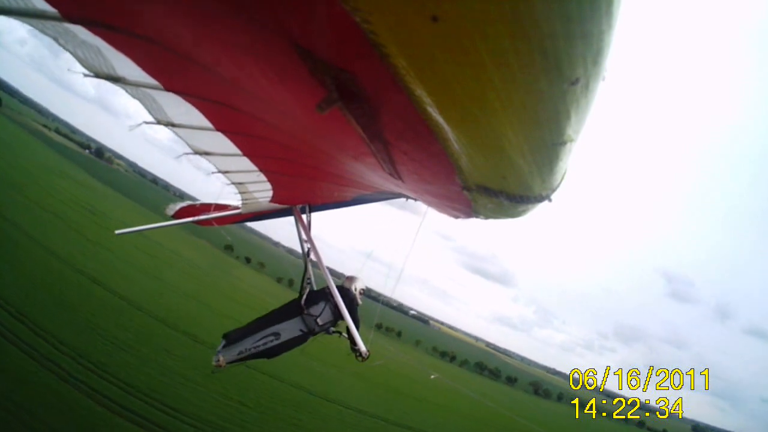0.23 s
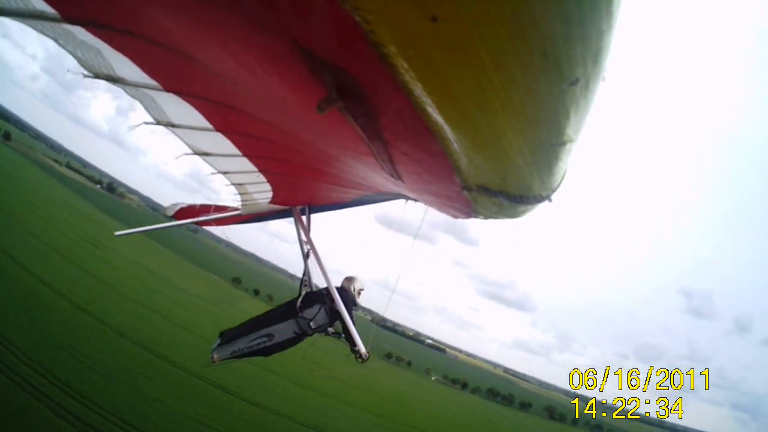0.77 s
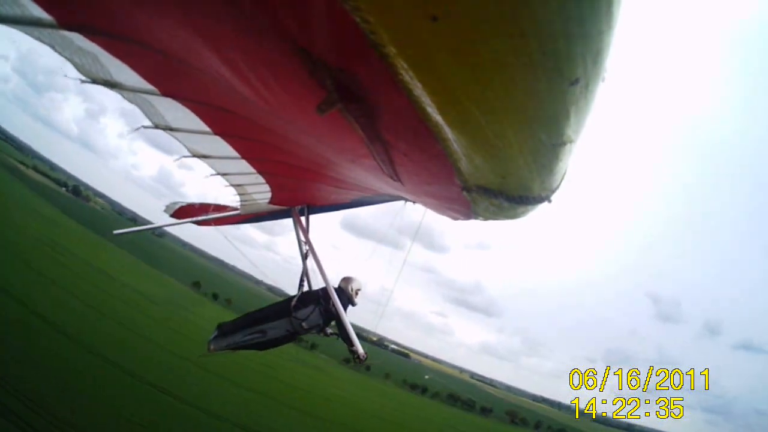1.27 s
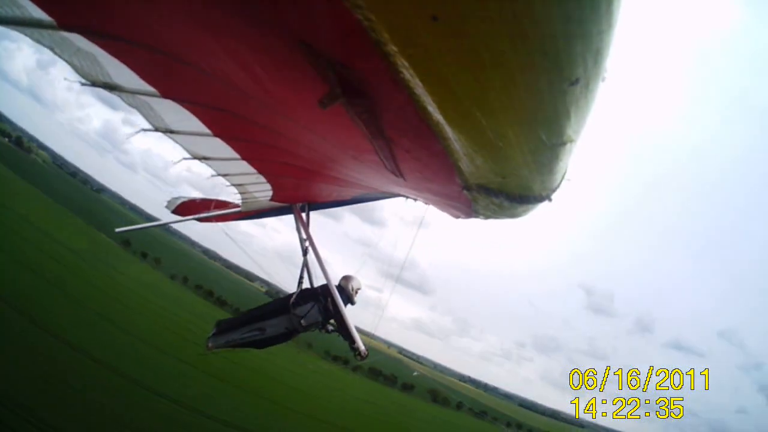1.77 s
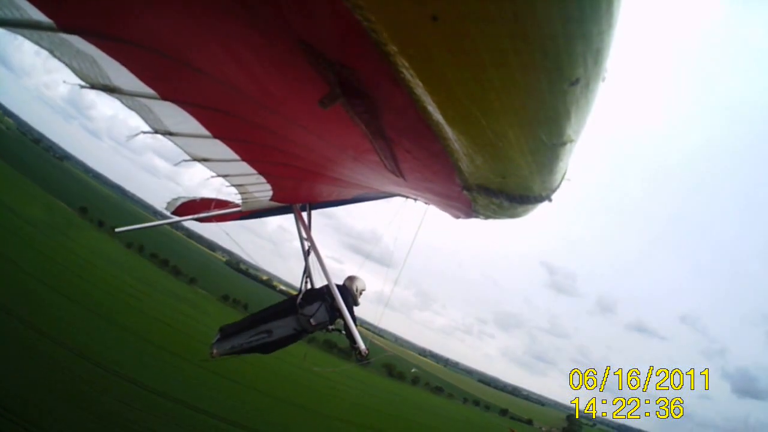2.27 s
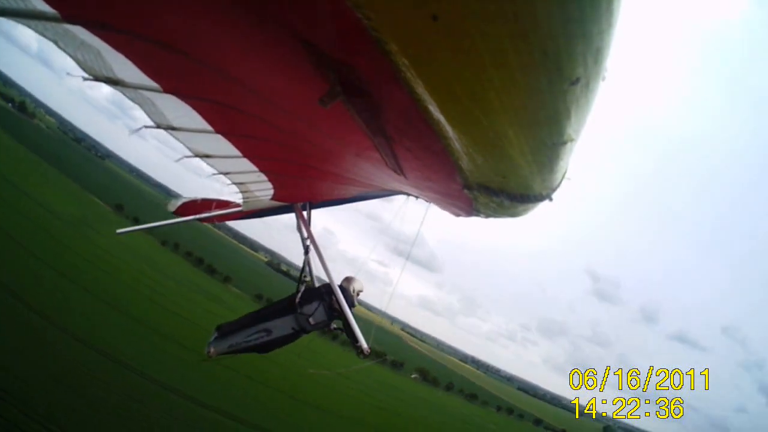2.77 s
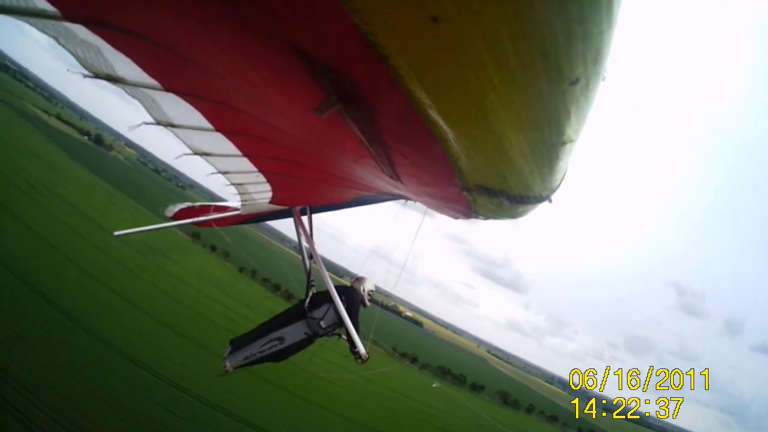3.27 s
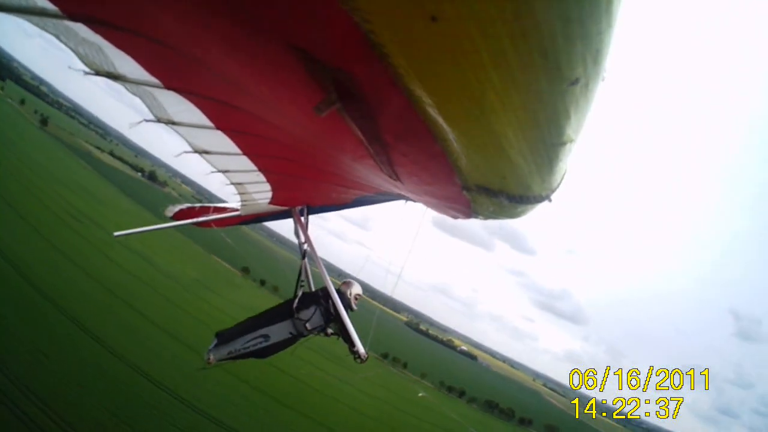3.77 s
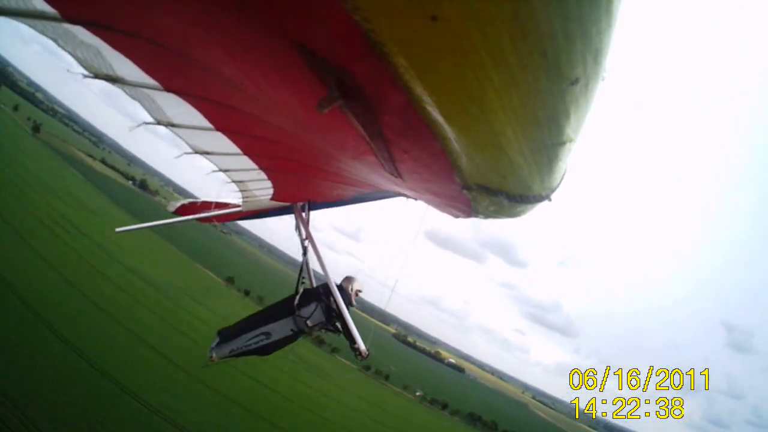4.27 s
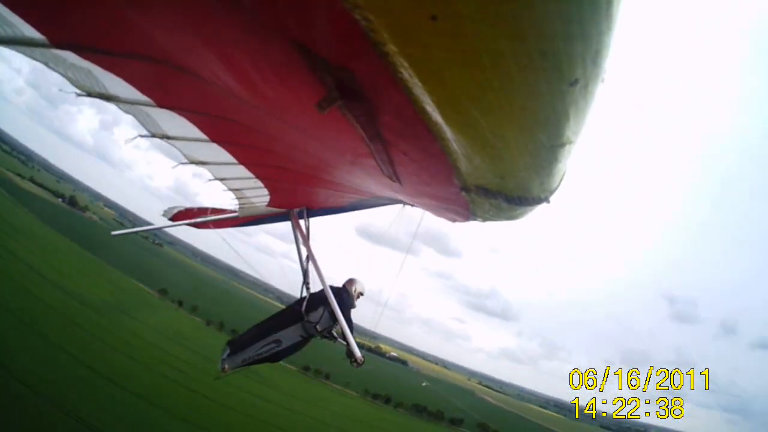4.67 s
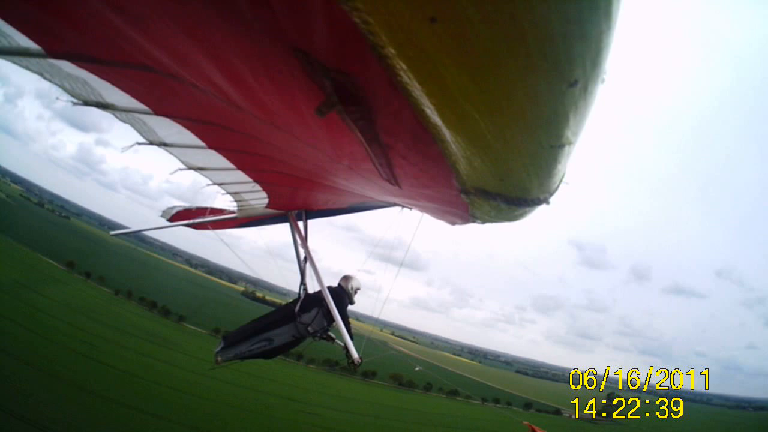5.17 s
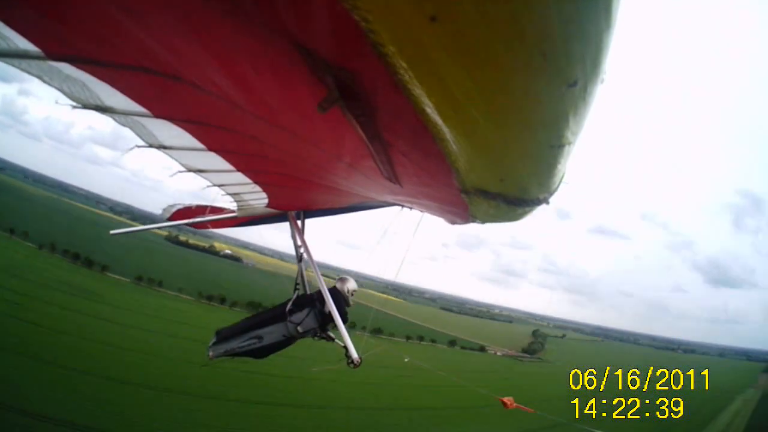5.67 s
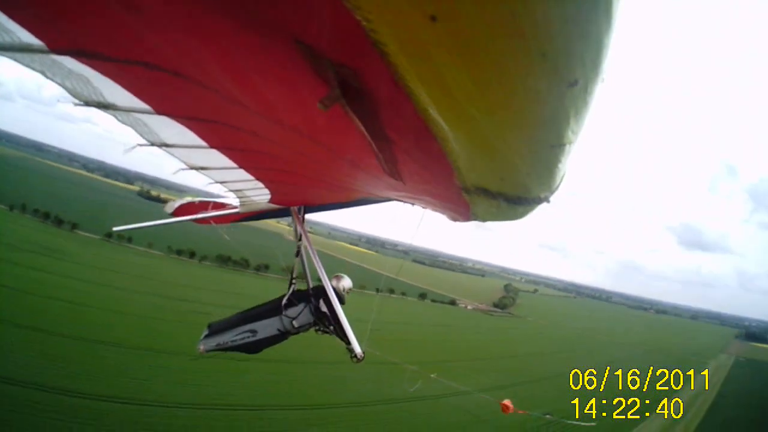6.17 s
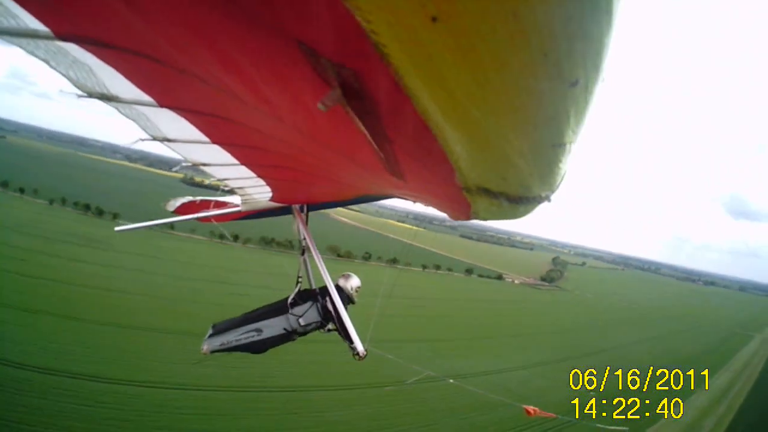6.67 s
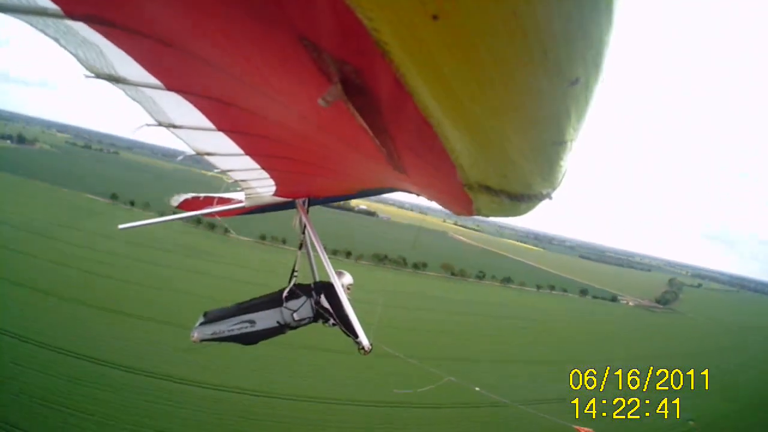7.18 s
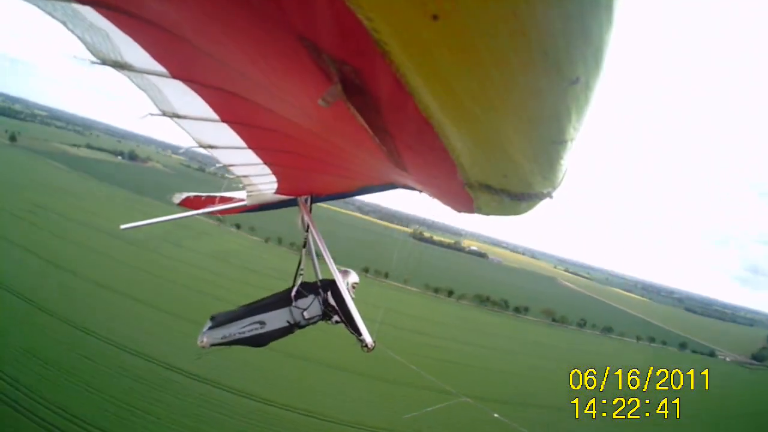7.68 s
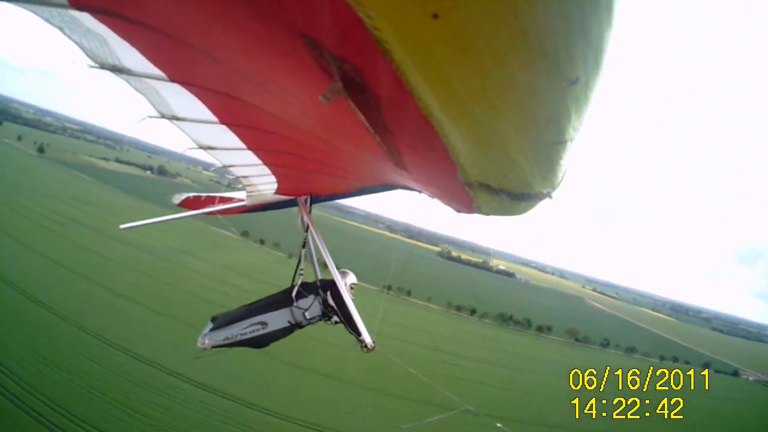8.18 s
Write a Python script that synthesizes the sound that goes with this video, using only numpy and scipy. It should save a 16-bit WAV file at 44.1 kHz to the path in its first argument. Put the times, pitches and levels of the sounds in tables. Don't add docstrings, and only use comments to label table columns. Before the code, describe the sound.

A microphone clamped to a glider's wing tube picks up heavy low rumble, a throbbing sail and a dull, hollow rush of air. Scattered knocks come in clusters. After a windier swell and a quieter lull, a violent clatter jolts the frame, rebounds in several thuds, and thins to sparse ticks over renewed wind.

```python
import sys
import numpy as np
from scipy import signal
from scipy.fft import rfft, irfft
from scipy.io import wavfile
from scipy.ndimage import uniform_filter1d

SR = 44100
rng = np.random.default_rng(int(sys.argv[2]) if len(sys.argv) > 2 else 0)


def decibels_to_gain(level_db):
    exponent = np.asarray(level_db, float) / 20
    return 10 ** exponent


def wrap_up_sound(samples):
    columns = np.atleast_2d(samples).T
    tamed = np.clip(columns, -1, 1)
    steps = np.round(tamed * 32767).astype(np.int16)
    wavfile.write(sys.argv[1], SR, steps)


N = 371763
TIME_S = np.arange(N) / SR


def in_time(rows):
    s, *columns = np.transpose(rows)
    return [np.interp(TIME_S, s, column) for column in columns]


def rms_one(x):
    return x / np.sqrt(np.mean(x ** 2) + 1e-20)


def drift(rate_hz):
    r = np.exp(-80 * np.pi * rate_hz / SR)
    white = rng.standard_normal(N // 40 + 2002)
    slow = signal.lfilter([1], [1, -2 * r, r * r], white)[2000:]
    return np.interp(np.arange(N) / 40, np.arange(len(slow)), rms_one(slow))


def resonate(x, hz, width_hz):
    r = np.exp(-np.pi * width_hz / SR)
    zeros = np.array([1, 0, -1]) * (1 - r * r) / 2
    poles = [1, -2 * r * np.cos(2 * np.pi * hz / SR), r * r]
    return signal.lfilter(zeros, poles, x + 1e-18)


def evened(x, window_s, share):
    power = uniform_filter1d(x ** 2, size=int(window_s * SR)) + 1e-9
    return rms_one(x / power ** (share / 2))


# t/s, level/dB
SWAY = [(0.0, -27.5), (0.7, -30), (1.03, -29.5), (2.49, -42), (2.96, -28), (3.19, -24.5), (3.85, -25),
        (4.27, -32.5), (4.69, -31.5), (5.05, -39.5), (5.33, -35), (5.8, -42), (6.17, -32.5), (7.0, -36.5),
        (8.12, -38), (8.43, -43.5)]
# f/Hz, level/dB per Hz
BUFFET = [(10, 1.5), (25, 0), (50, 0.5), (100, -0.5), (160, -14.5), (200, -23), (300, -38.5)]
HUM_DB, HUM_FOLLOWS, HUM_FOLLOWS_SWAY, HUM_WANDER_DB = -29, 0.76, 0.3, 1.5


def frame():
    speed_db, _ = air_stream()
    rough_db, = in_time(SWAY)
    flutter_hz, flutter_db = in_time(FLUTTER)
    sway_db = jolted(rough_db + 3.0 + 2.1 * drift(2.6), column=1)
    hum_db = HUM_DB + HUM_FOLLOWS * speed_db + HUM_FOLLOWS_SWAY * (rough_db - rough_db.mean())
    hum_db = jolted(hum_db + HUM_WANDER_DB * drift(1.9), column=2)
    shaken = flutter(flutter_hz, flutter_db)
    shaken = shaken + decibels_to_gain(sway_db + 1.0) * sway(speed_db) + decibels_to_gain(hum_db - 1.0) * batten_hum()
    port_db = 0.54 * (sway_db + hum_db) - 0.039 * flutter_db + 0.9
    return shaken + decibels_to_gain(port_db) * buffet(BUFFET, lumpy_db=-3.0)


# t/s, f/Hz, level/dB
FLUTTER = [(0.0, 74.51, -23.5), (1.06, 76.24, -22), (2.35, 68.9, -26.5), (2.96, 79.17, -24.5),
           (3.19, 65.1, -23.5), (3.52, 68, -19), (3.71, 75.77, -19), (3.83, 66.5, -23.5),
           (4.3, 73.32, -21.5), (4.51, 67.31, -27), (5.42, 72.7, -28.5), (5.66, 66.33, -35.5),
           (6.15, 75.82, -27), (6.93, 63.54, -35.5), (7.04, 75.95, -25.5), (7.37, 68.66, -30.5),
           (7.65, 76.8, -28), (8.43, 70.5, -32)]


def flutter(hz, level_db):
    turns = np.cumsum(hz * (1 + 0.03913 * drift(8.57))) / SR
    tone = np.sqrt(2) * np.sin(2 * np.pi * turns)
    return tone * decibels_to_gain(level_db - 0.26 + puffs() + 2.2 * drift(21))


# t/s, change of the flutter level/dB
PUFFS = [(0.27, -11), (0.62, -10.5), (0.92, 7), (1.55, -19), (1.74, -1.5), (1.9, -9), (2.6, 4), (3.08, -2),
         (3.28, 3), (3.34, -2), (4.46, -12.5), (4.86, 8.5), (5.0, -3.5), (5.33, -7), (5.54, 7.5),
         (5.73, -8), (6.36, -17), (6.74, 8.5), (6.88, -6), (7.3, -23), (7.39, 1.5), (7.51, -5), (7.71, -5),
         (7.96, 7)]


def puffs():
    puff_s = 0.039
    return sum(db * np.exp(-((TIME_S - s) / puff_s) ** 2) for s, db in PUFFS)


def sway(speed_db):
    sway_hz, width_hz = 40.34, 8
    loose = resonate(resonate(rng.standard_normal(N), sway_hz, width_hz), sway_hz, 37)
    turns = np.cumsum(sway_hz * (1 + 0.017 * drift(1.0))) / SR
    locked = np.sqrt(2) * np.sin(2 * np.pi * turns)
    lock = np.clip(speed_db / 8.7, 0, 1)
    return np.sqrt(lock) * locked + np.sqrt(1 - lock) * evened(loose, 0.055, share=0.61)


def batten_hum():
    hum_hz, width_hz = 134.7, 31
    hum = resonate(resonate(rng.standard_normal(N), hum_hz, width_hz), hum_hz, 98)
    return evened(hum, 0.081, share=0.4)


# t/s, sway level/dB, batten hum level/dB, port eddies level/dB, fall/s
JOLTS = [
    (6.069, -16.5, -22, -26.5, 0.097),
    (6.36, -41, -42, -47, 0.029),
    (6.481, -14.5, -45, -37, 0.043),
]


def jolted(steady_db, column):
    rise_share = 0.68
    power = decibels_to_gain(2 * steady_db)
    for row in JOLTS:
        late = (TIME_S - row[0]) / row[-1]
        late = np.where(late < 0, late / rise_share, late)
        power = power + decibels_to_gain(2 * row[column]) * np.exp(-2 * late ** 2)
    return 10 * np.log10(power)


def buffet(spectrum, lumpy_db):
    hz = np.fft.rfftfreq(N, 1 / SR) + 1
    corner_hz, corner_db = np.transpose(spectrum)
    colour_db = np.interp(np.log(hz), np.log(corner_hz), corner_db, right=-120)
    noise = irfft(rfft(rng.standard_normal(N)) * decibels_to_gain(colour_db), N)
    return rms_one(noise) * decibels_to_gain(lumpy_db * drift(4.4))


# t/s, peak level/dB, middle modes relative level/dB, top modes relative level/dB
RELEASE = [(5.998, -6, -19.5, -36), (6.004, -17, -13, -33), (6.014, -10.5, -13, -33),
           (6.025, -16.5, -10, 7.5), (6.030, -9.5, -1, -25), (6.043, -6, -12, -35), (6.055, -5.5, -14, -8),
           (6.061, -6, -2.5, -20), (6.070, 4, -5.5, -25), (6.076, -2.5, -6.5, -11),
           (6.083, -10.5, -4.5, -3.5), (6.087, -9, -6, -1), (6.099, -2.5, -2.5, -13),
           (6.103, -0.5, -6, -16.5), (6.111, -10, -4, -14), (6.116, -6.5, 2, -16), (6.124, -2, -16, -23),
           (6.132, -14, -7, -17), (6.146, -5.5, -6, -26), (6.165, 0, -12.5, -22.5), (6.172, -15, 1, -21),
           (6.178, -15, 2, -14), (6.183, -6, -9.5, -18), (6.189, 8, -13.5, -28.5), (6.194, 1.5, -17.5, -23)]
# t/s, peak level/dB, middle modes relative level/dB
KNOCKS = [(0.174, -19, -29), (0.771, -28.5, -16.5), (1.266, -18, -12.5), (1.327, -20, -12),
          (1.346, -13, -16), (1.363, -15, -12), (1.415, -17, -24), (1.501, -19.5, -8.5),
          (1.589, -22.5, -22), (3.342, -14, -22.5), (3.465, -16, -27), (3.494, -14.5, -23),
          (4.373, -23.5, -24), (4.393, -21, -2), (4.427, -16.5, -12), (4.444, -24, -17), (4.55, -25, -14),
          (4.574, -19, -14), (4.589, -16.5, -14.5), (4.639, -21, -18), (4.664, -20, -24), (4.702, -27, -28),
          (4.75, -21, -26), (5.007, -23.5, -16), (5.261, -23.5, -29), (5.414, -18, -13.5),
          (5.436, -17.5, -16.5), (5.498, -24, -11)]
# t/s, peak level/dB, middle modes relative level/dB
SETTLING = [(6.272, -17, 1.5), (6.301, -13.5, -18), (6.395, -13, -13), (6.494, -12.5, -21),
            (6.572, -29, -21), (6.611, -17.5, -24), (6.634, -22, -17), (6.855, -18, -9.5),
            (7.013, -22.5, -22), (7.075, -21, -13), (7.19, -22, -19), (7.603, -26, -27)]
# t/s of landing, peak level/dB, middle modes relative level/dB,
# top modes relative level/dB, touch earlier by/ms
ROCKS = [(1.44, -16.5, -7.5, -41, 9.2), (4.517, -14.5, -18, -48, 20), (5.114, -23, -19, -37, 18),
         (5.234, -13, -4, -19, 11), (5.343, -22.5, -7.5, -38, 26), (5.519, -24, -8.5, -28, 24),
         (6.331, -5, -15, -31, 7), (6.384, -12, -5.5, -23, 10), (6.431, -9, -16, -30, 14),
         (6.487, -12, -10, -15, 7.2), (6.914, -12.5, -12.5, -36, 16), (7.297, -18, -10, -31, 28)]
KNOCK_TOP_DB, KNOCK_MS, RELEASE_MS = -33.5, 5.18, 3.17
TOUCH_LOSS_DB, TOUCH_BRIGHTER_DB, TOUCH_MS = 9, 6, 4.3
TAUT_TOP_GAIN = 2.7


def contacts():
    speed_db, _ = air_stream()
    rows = [(*row, RELEASE_MS) for row in RELEASE]
    for s, db, middle_db in KNOCKS + SETTLING:
        taut_db = TAUT_TOP_GAIN * max(speed_db[round(s * SR)], 0)
        rows.append((s, db, middle_db, KNOCK_TOP_DB + taut_db, KNOCK_MS))
    for s, db, middle_db, top_db, earlier_ms in ROCKS:
        rows.append((s, db, middle_db, top_db, KNOCK_MS))
        touch_s = s - earlier_ms / 1000
        rows.append((touch_s, db - TOUCH_LOSS_DB, middle_db + TOUCH_BRIGHTER_DB, KNOCK_TOP_DB, TOUCH_MS))
    lengths = np.exp(0.2 * rng.standard_normal(len(rows)))
    return [(*row[:-1], row[-1] * length) for row, length in zip(rows, lengths)]


# f/Hz, width in the wind f/Hz, wind level/dB, width when struck f/Hz, struck level/dB
LOW_MODES = [(384, 200, -18, 98, -15.5), (549, 95, -4, 70, -6), (747.3, 130, 1.5, 70, -0.5),
             (895.6, 106, 1.5, 87, -6), (1079, 131, 0.5, 53, 2), (1206, 190, -3.5, 25, -17)]
MIDDLE_MODES = [(1660, 170, -8.5, 270, -11), (2188, 150, -1.5, 85, 0.5), (2390, 300, -3, 150, -5),
                (2602, 220, 1.5, 81, 5.5), (2758, 160, -6.5, 160, 2.5), (3050, 140, -4.5, 54, -21.5)]
TOP_MODES = [(3550, 130, -12.5, 120, 8), (3873, 500, -7, 120, 2), (4422, 420, -10, 170, 7.5),
             (4800, 450, -17, 380, -6), (5250, 1300, -40.5, 220, -0.5), (6700, 2800, -27, 470, -12)]


def knocks(events):
    rows = np.array(events)
    length = 2600
    chatter = rng.standard_normal((len(rows), length))
    uneven = rng.standard_normal((len(rows), 18))
    age_ms = np.arange(length) / SR * 1000
    out = np.zeros(N + length)
    k = 0
    # modes, relative dB, group dB, share of the contact length, lead in ms
    groups = ((LOW_MODES, 0, -3, 2.4, 3.2),
              (MIDDLE_MODES, rows[:, 2], -2.5, 1.3, 1.4),
              (TOP_MODES, rows[:, 3], -2.2, 0.9, 0.2))
    for modes, rel_db, group_db, brief, lead_ms in groups:
        span_ms = np.clip(rows[:, 4:] * brief, 0.2, 30)
        pressure = np.sin(np.pi * np.clip(age_ms / span_ms, 0, 1) ** (brief / 3))
        force = chatter * pressure
        rings = 0
        for hz, _, _, width_hz, struck_db in modes:
            ring = resonate(resonate(force, hz, width_hz), hz, 0.34 * hz)
            rings = rings + ring * (-1) ** k * decibels_to_gain(struck_db + 0.35 * uneven[:, k:k + 1])
            k += 1
        gains = decibels_to_gain(rows[:, 1] + rel_db + group_db) / np.abs(rings).max(axis=1)
        for s, gain, ring in zip(rows[:, 0] - lead_ms / 1000, gains, rings):
            out[round(s * SR):][:length] += gain * ring
    return out[:N]


# t/s, speed as high rush level/dB, extra turbulence of sideslip level/dB
AIR = [(0.0, -42, 0.5), (0.84, -43, -.5), (1.15, -46, -1.5), (1.76, -46, 1.5), (2.4, -43.5, -0.3),
       (2.58, -41.5, 2.5), (2.95, -40.5, 3), (3.36, -39.5, 0.5), (3.76, -40, -0.5), (4.25, -47.5, -0.1),
       (4.5, -49.5, -1.5), (5.14, -52.5, -0.1), (5.8, -52, -0.5), (6.41, -51, 1.2), (6.8, -48.5, 0.2),
       (7.25, -44.5, 1.2), (7.7, -44.5, -1.5), (8.43, -48, -0.5)]


def air_stream():
    air_db, slip_db = in_time(AIR)
    return air_db + 45, slip_db


# f/Hz, level/dB per Hz
EDDIES = [(120, -19), (185, 2), (260, -3), (400, -3), (1000, -13.5), (1400, -25.5), (1900, -19),
          (3300, -26), (5000, -37.5), (6500, -53), (7200, -55.5)]
HIGH_RUSH_DB, LOW_RUSH_DB, LOW_FOLLOWS = -45.5, -37, 0.79
EDDY_DB, EDDY_FOLLOWS, EDDY_FOLLOWS_SLIP = -39.5, 0.87, 1.2


def rush():
    speed_db, slip_db = air_stream()
    low_db = LOW_RUSH_DB + LOW_FOLLOWS * speed_db + slip_db
    high_db = HIGH_RUSH_DB + speed_db
    eddy_db = jolted(EDDY_DB + EDDY_FOLLOWS * speed_db + EDDY_FOLLOWS_SLIP * slip_db, column=3)
    gust = drift(3.9) + 0.34 * drift(45)
    low = decibels_to_gain(low_db) * singing(LOW_MODES, 0.49 * gust)
    high = decibels_to_gain(high_db) * singing(MIDDLE_MODES + TOP_MODES, 0.77 * gust)
    eddies = decibels_to_gain(eddy_db + 0.22 * gust) * buffet(EDDIES, lumpy_db=1.45)
    return low + high + eddies


def singing(modes, gust_db):
    out = 0
    for hz, width_hz, wind_db, _, _ in modes:
        band = resonate(resonate(rng.standard_normal(N), hz, 1.2 * width_hz), hz, 1.2 * width_hz)
        out = out + band * decibels_to_gain(wind_db + 0.36 * drift(6.4))
    return rms_one(out * decibels_to_gain(gust_db))


def wire():
    wire_hz, width_hz = 559.4, 20
    hum = resonate(resonate(rng.standard_normal(N), wire_hz, width_hz), wire_hz, 2 * width_hz)
    return decibels_to_gain(-51.5) * rms_one(hum)


def scene():
    return (frame() + knocks(contacts()) + rush() + wire())[None]


def low_pass(x):
    return signal.sosfilt(signal.butter(12, 15750, fs=SR, output="sos"), x)


def record(dry):
    lowpass = signal.cheby2(8, 30, 7010, fs=SR, output="sos")
    dull = signal.sosfilt(lowpass, np.clip(dry, -1.05, 1.05))
    fade = np.clip((N - np.arange(N)) / (0.012 * SR), 0, 1)
    hiss = decibels_to_gain(-94) * rng.standard_normal(N)
    return low_pass(np.clip(dull, -0.97, 0.97) * fade + hiss)


dry = scene()
out = record(dry)
wrap_up_sound(out)
```